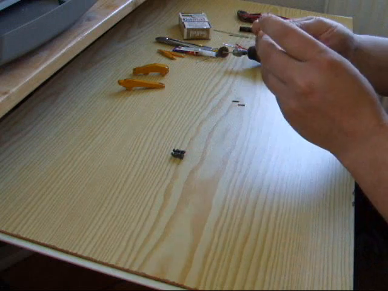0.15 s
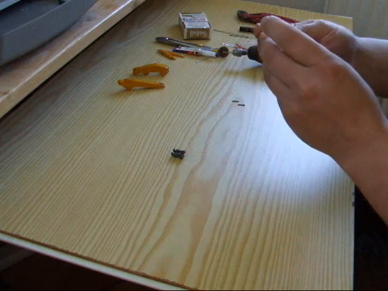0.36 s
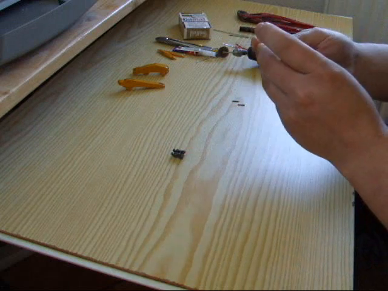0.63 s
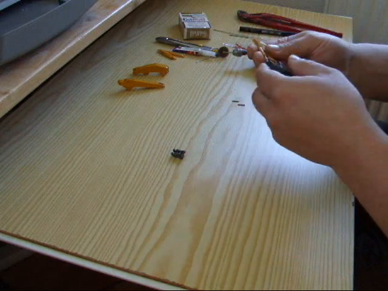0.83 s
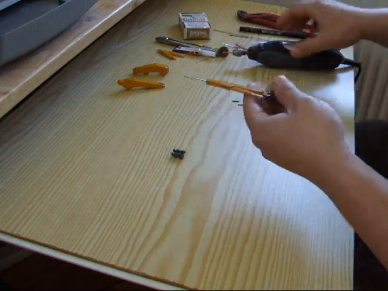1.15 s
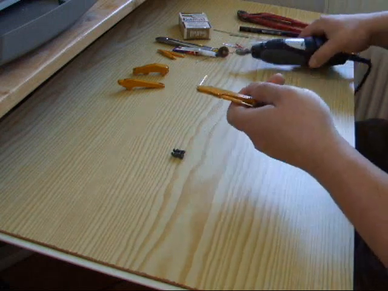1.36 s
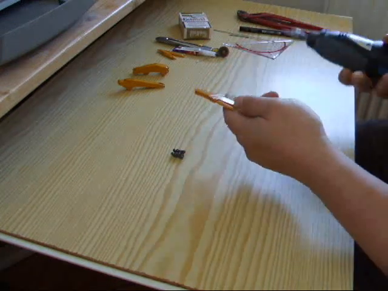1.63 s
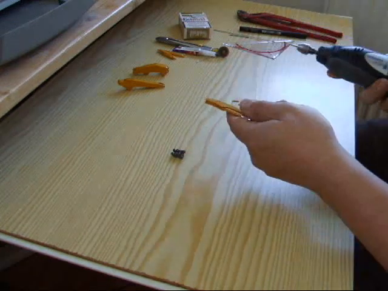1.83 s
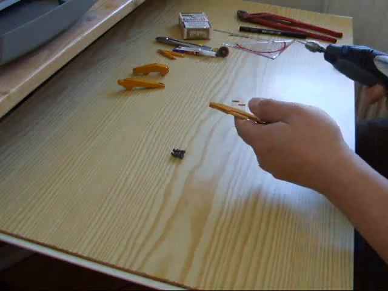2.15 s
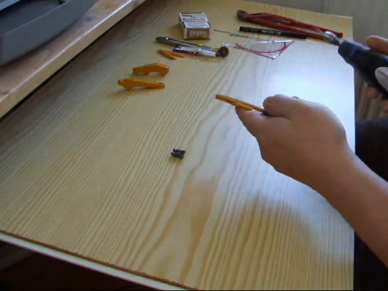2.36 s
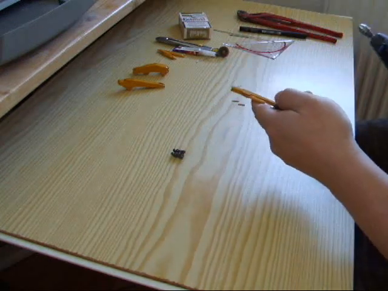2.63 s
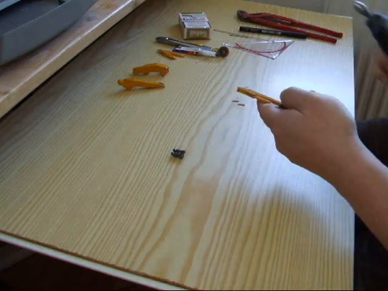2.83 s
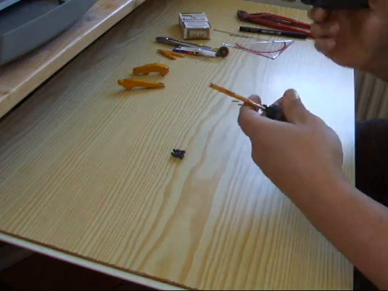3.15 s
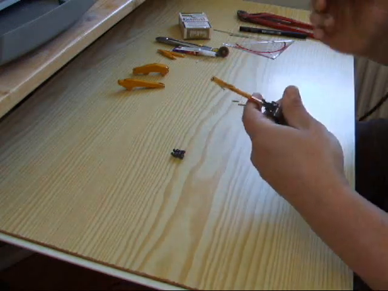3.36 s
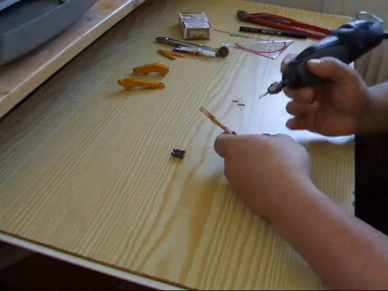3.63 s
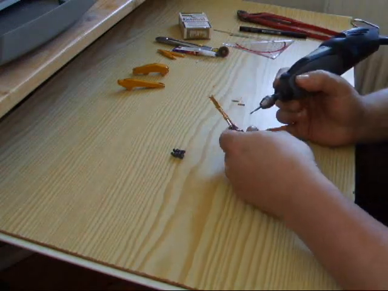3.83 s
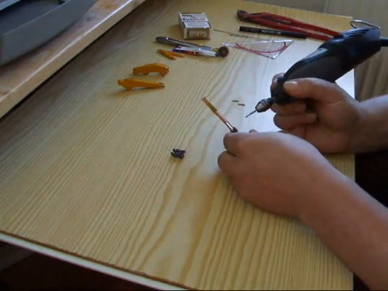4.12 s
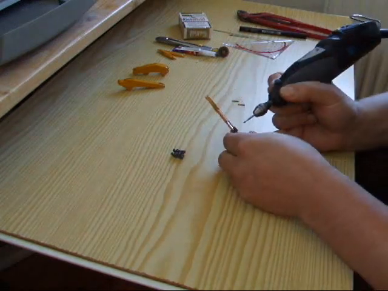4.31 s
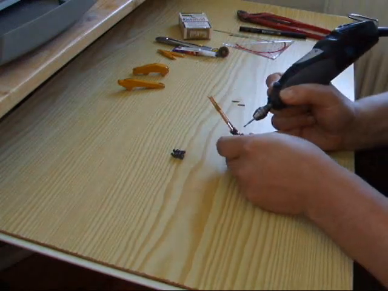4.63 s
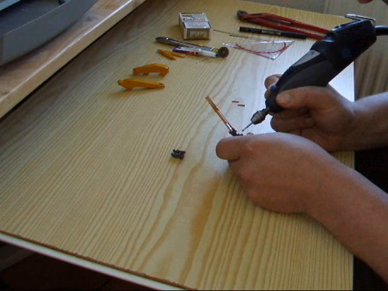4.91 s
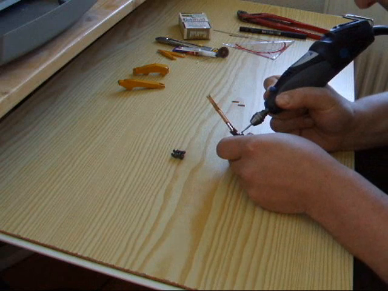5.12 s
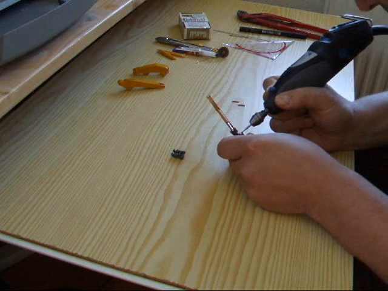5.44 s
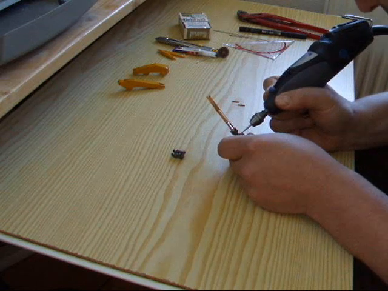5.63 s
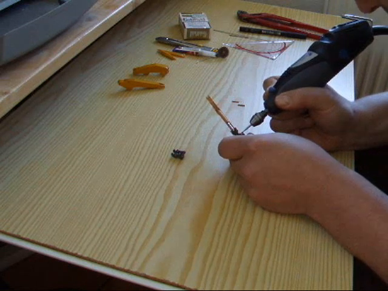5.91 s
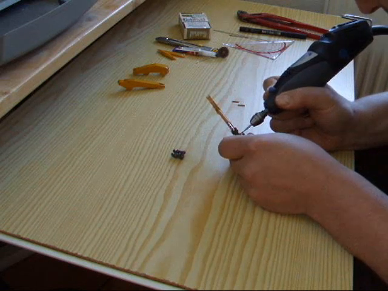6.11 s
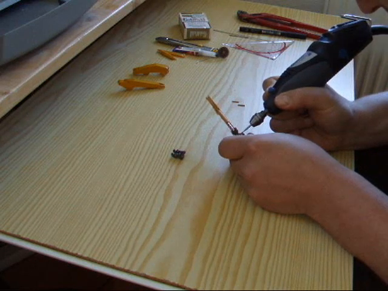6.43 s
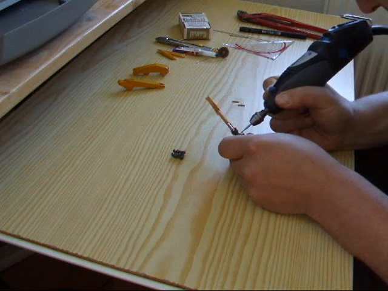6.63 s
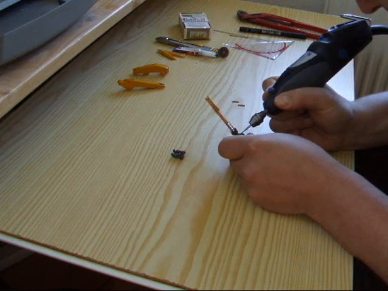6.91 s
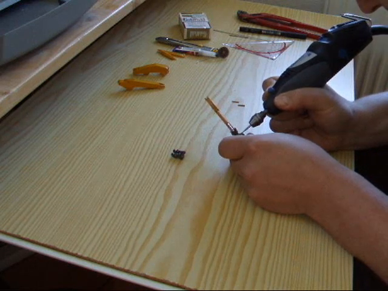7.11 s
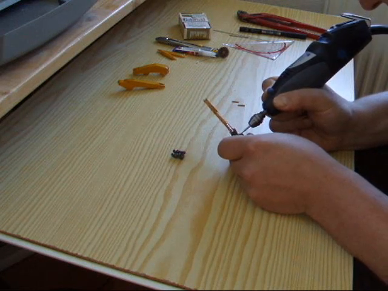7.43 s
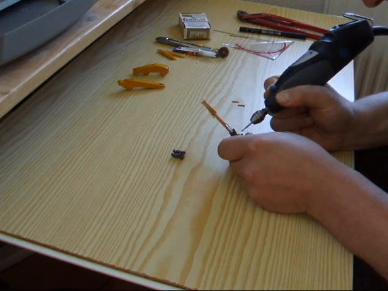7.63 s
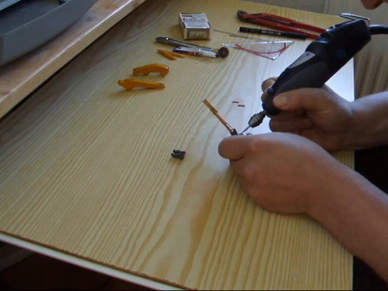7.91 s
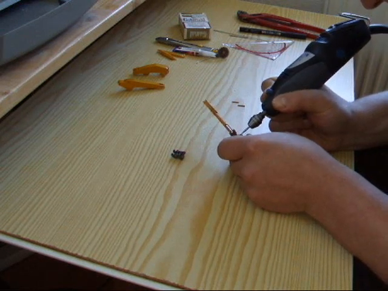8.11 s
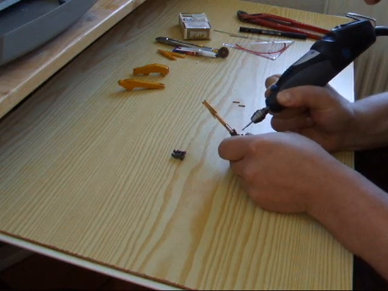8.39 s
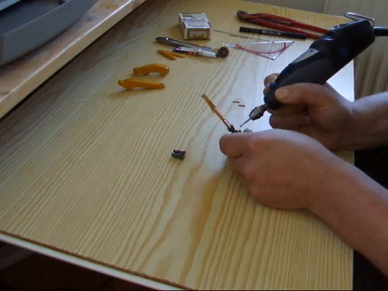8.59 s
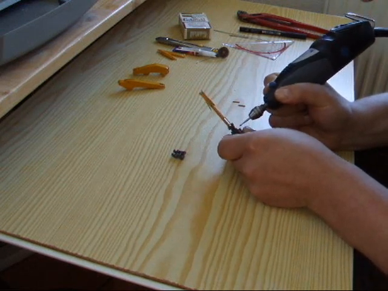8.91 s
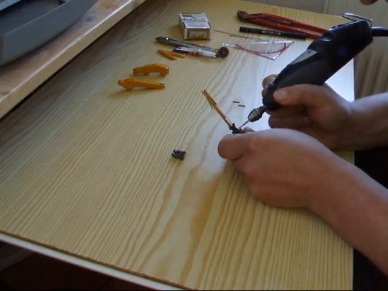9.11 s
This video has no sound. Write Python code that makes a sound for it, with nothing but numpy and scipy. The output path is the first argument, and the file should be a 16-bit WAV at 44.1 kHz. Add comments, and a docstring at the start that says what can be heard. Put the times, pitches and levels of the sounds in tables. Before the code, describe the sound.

Handheld rotary tool starts with a groan, settles into a high hissing whine, then its bit chatters and squeals into a small part as the pitch sags.

```python
"""Rotary tool drilling a small part

A small rotary tool is picked up from a wooden desk, switched on, and drills a small part held in the other hand.
Summed sines that follow the shaft give the whine and the mains-pulsed slot tones; filtered noise gives the hiss.
The bit squeals (shaped noise) and chatters (shaft overtones) as it bites, drags the speed down and nearly jams once.
Thin squeaks (gliding sines) come before the motor; knocks and clicks (noise clicks over decaying desk modes)
come before it and twice while it runs. A small room and a soft hiss lie behind.
"""
import sys
import numpy as np
from scipy import signal
from scipy.fft import rfft, irfft, next_fast_len
from scipy.io import wavfile

SR = 44100
rng = np.random.default_rng(int(sys.argv[2]) if len(sys.argv) > 2 else 0)


def dump_mix(stems):
    """Bounce the given channels to the path in sys.argv[1] as a 16-bit WAV at rate SR."""
    frames = np.atleast_2d(stems).T  # one column per channel
    limited = np.clip(frames, -1, 1)  # hard clip at full scale
    pcm = np.round(limited * 32767).astype(np.int16)
    wavfile.write(sys.argv[1], SR, pcm)


N = 408366
TIME = np.arange(N) / SR
MAINS_PULSE_HZ, FREE_HZ = 200, 531.8  # FREE_HZ: unloaded shaft speed
# the bit is pressed in ever harder, then let go; a cut shorter than rise_s ends before full drag:
# start_s, length_s, first_drag_hz_per_s, full_drag_hz_per_s, rise_s
CUTS = [(6.95, .72, 25, 1100, 1.2), (8.0, .44, 222, 1489, .369)]


def amp(db):
    """Decibels to gain."""
    return 10 ** (np.asarray(db) / 20)


def unit(x):
    """Scales to rms 1."""
    return x / np.sqrt(np.mean(x ** 2) + 1e-20)


def colour(x, points):
    """Filters by a spectrum drawn as (hz, db) on a log-frequency axis."""
    hz, db = np.transpose(points)
    size = next_fast_len(len(x) + 2048)
    f = np.fft.rfftfreq(size, 1 / SR)
    gain = amp(np.interp(np.log(f + 1), np.log(hz), db))
    return irfft(rfft(x, size) * gain, size)[:len(x)]


def drift(rate_hz):
    """Random wander of rms 1: straight lines between rate_hz random knots a second."""
    knots = rng.standard_normal(4096)
    return unit(np.interp(TIME * rate_hz, np.arange(len(knots)), knots))


def resonate(x, hz, width_hz):
    """One resonance."""
    return signal.lfilter(*signal.iirpeak(hz, hz / width_hz, SR), x)


def ring(x, modes, low_hz, high_hz):
    """Passes x through resonances, each at its own level, trims their skirts and scales to rms 1."""
    y = sum(amp(db) * unit(resonate(x, hz, width_hz)) for hz, width_hz, db in modes)
    return unit(signal.sosfilt(signal.butter(3, [low_hz, high_hz], "band", fs=SR, output="sos"), y))


def swell(start_s, attack_s, hold_s, release_s, db):
    """Gain of one event: a straight rise, a hold and an exponential tail."""
    t = TIME - start_s
    fall = np.exp(-np.clip((t - attack_s - hold_s) / release_s, 0, 40))
    return amp(db) * np.clip(t / attack_s, 0, 1) * fall


def tone(turns):
    """A sine that follows a count of cycles."""
    return np.sin((2 * np.pi * (turns % 1)).astype(np.float32))


def add(mix, start_s, sound):
    """Mixes a sound in at start_s."""
    part = mix[max(round(start_s * SR), 0):][:len(sound)]
    part += sound[:len(part)]


def pressure():
    """Drag on the shaft in Hz per s: the hand eases into each cut."""
    drag = 0
    for start_s, length_s, first, full, rise_s in CUTS:
        ease = np.sin(np.pi / 2 * np.clip((TIME - start_s) / rise_s, 0, 1)) ** 2
        drag = drag + (first + (full - first) * ease) * (TIME > start_s) * (TIME < start_s + length_s)
    return drag


def shaft(drag):
    """Speed in Hz and accumulated turns: pull grows with the lag, up to a limit, against the drag."""
    on_s, step = 2.12, 44  # step in samples
    pull_per_s, deep_pull_per_s, max_pull_hz_per_s = 2.558, 5.546, 1330
    stiff_share, stiff_s = .177, 1.39  # a little stiff at the start
    times, speeds_hz = TIME[::step], [0.]
    for t, load in zip(times[:-1], drag[::step]):
        lag = 1 - speeds_hz[-1] / FREE_HZ
        pull = FREE_HZ * (pull_per_s * lag + deep_pull_per_s * lag ** 3)
        pull *= 1 - stiff_share * np.exp((on_s - t) / stiff_s)
        net = min(pull, max_pull_hz_per_s) - load
        speeds_hz.append(speeds_hz[-1] + (t > on_s) * net * step / SR)
    hz = np.interp(TIME, times, speeds_hz) * (1 + .0005 * drift(70))  # never quite even
    return hz, np.cumsum(hz) / SR


def motor_levels(hz, wake_hz=235):
    """Gains of hiss, whine and low slot tone: they grow with speed and change as the tool is moved."""
    # level as the tool is moved about in the hand, with one brief dip: time_s, level_db
    loudness = [(2.3, 2.5), (2.9, .7), (3.5, 1), (4.15, 1.3), (4.6, 0), (5.9, 0), (6.48, -1.3), (6.6, -8),
                (6.72, -1.5), (6.95, -.5), (7.3, -2.5), (8.0, -1.2), (8.3, -3), (8.6, -1.5), (9.26, -.7)]
    # brief flares of the tones: centre_s, half_width_s (to 1/e in dB), low_slot_db, whine_db
    flares = [(2.38, .05, 0, 2), (2.97, .14, 7, 0), (3.1, .055, 14.5, 1.5), (3.7, .22, 2, 2.5),
              (4.18, .06, 2, 4), (7.58, .05, 4, 6), (8.42, .06, 0, 4)]
    # brushes spark on the starting current: start_s, attack_s, hold_s, release_s, level_db
    sparking = (2.11, .11, .22, .3, -35.5)
    # level laws: base_db, db_per_halving of speed
    air_law, whine_law, low_slot_law = (-26, -14), (1.5, -6.5), (-38, -34)
    whine_follows = 1.5  # the whine beams, so movement changes it more than the hiss

    def law_db(law):
        return law[0] + law[1] * np.log2(FREE_HZ / (hz + 1e-6))

    moved_db = np.interp(TIME, *np.transpose(loudness))
    low_db, whine_db = sum(np.outer(dbs, np.exp(-((TIME - centre_s) / width_s) ** 2))
                           for centre_s, width_s, *dbs in flares)
    air = np.hypot(amp(law_db(air_law) + moved_db), swell(*sparking))
    whine = amp(law_db(whine_law) + whine_follows * moved_db + whine_db)
    whine = whine * np.minimum(hz / wake_hz, 1) ** 6
    return air, whine, amp(law_db(low_slot_law) + moved_db + low_db)


def whine_lines(turns, strain):
    """Rotor lines at whole multiples of shaft speed and bearing lines between them."""
    # lines before the whine gain: shaft_multiple, level_db
    lines = [(1, -61), (2, -62), (2.55, -56), (3, -64), (7, -57), (14, -59), (17, -55), (18, -45),
             (18.79, -49), (19, -53), (20, -48), (21, -46), (22, -46), (23, -42), (23.23, -52), (24, -39),
             (25, -43), (25.16, -53), (26, -43), (27, -36), (28, -38), (28.16, -45), (29, -38), (30, -48),
             (31, -44), (32, -40), (33, -48), (34, -49)]
    # below full speed the lines sweep through many small resonances and flutter
    flutter_db = 2 + 3.5 * np.tanh(50 * strain)
    return sum(amp(db + flutter_db * np.tanh(drift(13))) * tone(k * turns + rng.random())
               for k, db in lines)


def pulling_lines(turns, strain, chatter):
    """Overtones of the slot tone that stand out while the motor pulls hard."""
    # lines before strain, damping and whine gain: shaft_multiple, level_db
    lines = [(24, -36), (32, -41), (40, -46)]
    pulling = np.tanh(12 * strain) * sum(amp(db + 3.5 * drift(30)) * tone(k * turns) for k, db in lines)
    return pulling / (1 + chatter / amp(-31))  # pressing on the work damps them


def slot(turns, sidebands, fray, smear=0.079):
    """A slot tone gated by the mains pulses; the housing smears each burst, and jerky torque frays it."""
    out = 0
    for m, db in sidebands:
        phase = turns + m * MAINS_PULSE_HZ * TIME + smear * m ** 2 + fray * drift(150)
        out = out + amp(db) * tone(phase)
    return out


def slot_tones(hz, turns, strain, high_slot_db=-37, resonance_db=12):
    """Tones at 16 and 8 a turn; the upper swells as it sweeps through the top resonances of the shell."""
    # relative sidebands, 16 a turn: sideband_number, level_db
    high_sidebands = [(-4, -17), (-3, -15), (-2, -3), (-1, 0), (0, -1), (1, -5), (2, -5)]
    # relative sidebands, 8 a turn: sideband_number, level_db
    low_sidebands = [(-2, -16), (0, -4), (1, -3), (2, 1), (3, -1), (4, -8)]
    # top resonances of the shell: centre_hz, half_width_hz (to 1/e in dB)
    shell_top = [(4750, 690), (6150, 200)]
    crossing = sum(np.exp(-((16 * hz - centre_hz) / width_hz) ** 2) for centre_hz, width_hz in shell_top)
    upper = slot(16 * turns, high_sidebands, strain)
    lower = slot(8 * turns, low_sidebands, strain / 2)
    return amp(high_slot_db + resonance_db * crossing) * upper, lower


def spark_noise(mains, swing_db=None):
    """White noise pulsed by the mains, with an optional random level."""
    noise = rng.standard_normal(N) * (1 + .12 * mains)
    return noise if swing_db is None else noise * amp(swing_db)


def air_hiss(mains):
    """Fan and brushes: shaped noise of rms 1."""
    # relative spectrum: pitch_hz, density_db_per_hz
    air_spectrum = [(60, -24), (130, -31), (400, -21.5), (900, -11), (1500, -8), (2000, -3), (2450, 1.5),
                    (3200, -1), (4800, 0), (6000, 0.5), (7400, -2), (10500, -1), (13000, -1), (15400, 5.5)]
    return unit(colour(spark_noise(mains, 0.76 * drift(40)), air_spectrum))


def housing_rattle(mains, air, steady_rattle_db=-26):
    """The loose shaft rattles until the hand steadies the tool; a trace follows the hiss."""
    # broad resonances, relative level: pitch_hz, width_hz, level_db
    housing = [(2520, 750, -12.5), (3100, 840, 13), (3750, 1500, 18.5), (4470, 170, 20)]
    # loose spell: start_s, attack_s, hold_s, release_s, level_db
    loose = (2.5, .9, .72, .2, -35.5)
    rattle = ring(spark_noise(mains, 2.0 * drift(150)), housing, 2600, 5800)
    return (swell(*loose) + amp(steady_rattle_db) * air) * rattle


def starting_groan(mains):
    """The starting current makes the housing groan: noise through shell resonances."""
    # shell resonances, relative level: pitch_hz, width_hz, level_db
    shell = [(780, 90, -21), (1430, 73, -18), (2294, 100, 2.5), (3930, 70, 2.5), (5080, 110, 2.5)]
    # groan: start_s, attack_s, hold_s, release_s, level_db
    groan_event = (2.11, .12, .19, .035, -36.5)
    return swell(*groan_event) * ring(spark_noise(mains), shell, 630, 6400)


def motor(hz, turns, chatter, slow_fade_db=-24):
    """Rotor and bearing lines, pulsed slot tones, hiss, and the groaning, rattling housing."""
    air, whine, low_slot = motor_levels(hz)
    mains = tone(MAINS_PULSE_HZ * TIME + 1 / 4)
    # a slow motor draws more current: its torque is jerky and its lines fray
    strain = np.clip(1 - hz / hz.max(), 0, .5)
    turns = turns + strain * (.015 * drift(300) + .02 * mains)
    lines = whine_lines(turns, strain)
    pulling = pulling_lines(turns, strain, chatter)
    upper, lower = slot_tones(hz, turns, strain)
    free = amp(slow_fade_db * strain) * (lines + upper)
    tones = whine * (free + pulling) + low_slot * lower
    return tones + air * air_hiss(mains) + housing_rattle(mains, air) + starting_groan(mains)


def contact(press, choke_db=-1.5, grab=.055):
    """Gains of squeal and chatter; a cut grabs with some pressure, and much of it chokes the cut."""
    # skids on the part, in light touches and around the cuts: start_s, length_s, squeal_db, chatter_db
    skids = [(5.67, .07, -33, -65), (5.92, .12, -30, -44), (6.2, .22, -37, -54), (6.41, .33, -29.5, -43),
             (6.93, .43, -26.5, -41), (7.655, .04, -26.5, -40), (7.995, .06, -23, -42),
             (8.435, .03, -32, -44), (8.88, .02, -29, -47)]
    cut_squeal_db, cut_chatter_db = -37, -34.2
    cut_attack_s, cut_release_s = .06, .025
    skid_rise_share, skid_release_s = .24, .017
    pressed = sum(swell(start_s, cut_attack_s, length_s - cut_attack_s, cut_release_s, 0)
                  for start_s, length_s, *_ in CUTS)
    cutting = np.tanh(press / grab) * amp(choke_db * press) * pressed
    squeal, chatter = amp(cut_squeal_db) * cutting, amp(cut_chatter_db) * cutting
    for start_s, length_s, squeal_db, chatter_db in skids:
        rise_s = skid_rise_share * length_s
        skid = swell(start_s, rise_s, length_s - rise_s, skid_release_s, 0)
        squeal, chatter = squeal + amp(squeal_db) * skid, chatter + amp(chatter_db) * skid
    return squeal, chatter


def bit_scrape(turns, depth, scrape=0.27, ring_db=-12):
    """Rubbing noise pulsed once a turn; a deeper bite lowers and widens the squeal and rings the bit."""
    # skimming the surface, relative spectrum: pitch_hz, density_db_per_hz
    skim_spectrum = [(50, -52), (150, -31), (2500, -10), (7500, -33), (9000, -10), (10000, 6), (11000, -4),
                     (12600, 7), (14300, 6), (15400, -15.5)]
    # deep bite, relative spectrum: pitch_hz, density_db_per_hz
    deep_spectrum = [(50, -26), (150, -23), (700, -16), (2500, -28.5), (3500, -9), (5500, -22),
                     (8000, -3.5), (10000, -2), (11200, -2), (12800, -2), (15400, -17)]
    # ring of the bit, relative level: pitch_hz, width_hz, level_db
    bit_ring = [(3520, 130, 0)]
    grip = amp(1.8 * drift(130))
    rubbing = rng.standard_normal(N) * (1 + scrape * tone(turns)) * grip
    skimming = np.sqrt(1 - depth) * unit(colour(rubbing, skim_spectrum))
    biting = np.sqrt(depth) * unit(colour(rubbing, deep_spectrum))
    return skimming + biting + amp(ring_db) * depth * ring(rubbing, bit_ring, 2800, 4400)


def bit_catches(hz, turns, squeal, depth, light_db=-5.5, whirl_db=-8):
    """The edges catch once a turn: overtones of the shaft, weighted by the answer of the held part."""
    # answer of the held part, relative: pitch_hz, level_db
    part_answer = [(260, -14), (310, -9), (350, 0), (440, -3), (520, -5), (700, -8), (1050, -11),
                   (1250, -9), (1550, -3.5), (1850, -5), (2060, -4), (2400, -16), (3000, -10), (3500, -3),
                   (4100, -9), (7000, -14), (8500, -15), (10500, -8), (13000, -10), (15400, -15)]
    whirl_per_turn = .27
    uneven = turns + .01 * drift(250)
    # near a stall the edges push rather than strike, and the high overtones fade
    dull = np.clip(.75 - hz / hz.max(), 0, 1)
    # the bit sticks and slips, and its overtones flutter together
    slip_db = 3.2 * drift(75)
    # a skidding bit whirls round its hole: a tone just under each overtone above the first
    whirl = amp(whirl_db) * np.tanh(squeal / amp(-28))
    catches = np.zeros(N)
    for k in range(1, 34):
        flutter_db = min(k / 4, 1) * (slip_db + 2.5 * drift(60))
        db = np.interp(k * hz, *np.transpose(part_answer)) - 6 * (k - 1) * dull + flutter_db
        db = db + (k > 1) * light_db * (1 - depth)
        phase = k * uneven + rng.random()
        catches += amp(db) * (tone(phase) + (k > 1) * whirl * tone(phase - whirl_per_turn * turns))
    return catches


def jam_hammer(turns):
    """The jammed bit hammers the part: noise blows, one a turn, ring its resonances."""
    # resonances of the part, relative level: pitch_hz, width_hz, level_db
    part_modes = [(355, 28, -1), (700, 420, 1), (1110, 710, -0.5), (2020, 2200, -12), (3000, 1400, 4),
                  (3940, 1100, -8), (4940, 320, 1.5), (6000, 500, -9), (7200, 1700, -12), (10200, 800, -4)]
    # jam: start_s, attack_s, hold_s, release_s, level_db
    jam = (8.222, .075, .016, .028, -16.5)
    blows = rng.standard_normal(N) * (.5 + np.exp(-(turns % 1) / 0.22))
    return swell(*jam) * ring(blows, part_modes, 340, 10000)


def bit(hz, turns, squeal, chatter):
    """Scraping and catching edges at their contact gains, and the hammering jam."""
    depth = np.tanh(chatter / amp(-32))
    scraping = squeal * bit_scrape(turns, depth)
    catching = chatter * bit_catches(hz, turns, squeal, depth)
    return scraping + catching + jam_hammer(turns)


def boom(turns, press, lowest_hz=345, give_s=.012):
    """The once-a-turn push of the bit, growing with pressure, rings the part's low modes as it slows."""
    # low modes of the part, gain of each: pitch_hz, width_hz, level_db
    low_modes = [(351, 14, -11), (403, 16, -10), (447, 10, -21)]
    keep = np.exp(-1 / (give_s * SR))  # the hand gives, so the push eases off
    push = signal.lfilter([1 - keep], [1, -keep], press ** 2.4) * tone(turns)
    push = signal.sosfilt(signal.butter(5, lowest_hz, "high", fs=SR, output="sos"), push)
    return sum(amp(db) * resonate(push, hz, width_hz) for hz, width_hz, db in low_modes)


def knocks(crack_s=0.0016, tail_db=-15, tail_s=0.027):
    """A hard plastic click with a short scatter, and the desk top ringing under it."""
    # knocks on the desk and clicks in the hand: start_s, click_db, desk_db
    hits = [(1.127, -47, -80), (1.345, -31, -39), (1.429, -34.5, -42), (1.437, -36, -49), (1.446, -42, -52),
            (1.764, -41, -75), (1.769, -28, -67), (3.614, -37, -47.5), (4.17, -28, -70)]
    # modes of the desk top, relative level: pitch_hz, level_db, t60_s
    desk_modes = [(270, -10, .12), (345, -5, .35), (560, -4, .14), (660, -6, .08), (775, -1, .09),
                  (870, -3, .1), (1030, -7, .07), (1230, -9, .07), (1500, -10, .1), (1680, -9, .07),
                  (2500, -11, .06)]
    # plastic click, relative spectrum: pitch_hz, density_db_per_hz
    click_spectrum = [(300, -26), (2800, -18), (4500, 4), (6500, 3), (9000, -2), (12000, -1), (15400, -6)]
    out, t = np.zeros(N), np.arange(SR // 4) / SR
    click_decay = np.exp(-t / crack_s) + amp(tail_db) * np.exp(-t / tail_s)
    for start_s, click_db, desk_db in hits:
        click = unit(colour(rng.standard_normal(len(t)), click_spectrum)) * click_decay
        desk = sum(amp(db - 60 * t / t60_s) * np.sin(2 * np.pi * (hz * t + rng.random()))
                   for hz, db, t60_s in desk_modes)
        add(out, start_s, amp(click_db) * click + amp(desk_db) * desk)
    return out


def squeaks(rough=0.028):
    """Short thin unsteady glides with one overtone."""
    # start_s, length_s, start_hz, end_hz, level_db, overtone_db (relative to the glide)
    glides = [(0, 0.015, 5000, 4900, -29, -34), (.027, .01, 4900, 4850, -42, -30),
              (0, .05, 6150, 6100, -48, -30), (.115, 0.047, 7200, 7450, -46, -10),
              (.12, 0.083, 6250, 6550, -51, 1), (.17, 0.056, 7700, 9200, -46, -16),
              (.2, 0.045, 8800, 8900, -44, -20), (.265, .04, 8500, 8000, -51, -20),
              (.28, 0.085, 6450, 5900, -55.5, 5), (.55, 0.052, 8150, 8050, -50, -20),
              (1.0, .08, 8000, 7700, -53, -20), (1.85, 0.06, 3300, 3500, -48, -25),
              (1.89, .07, 3250, 3050, -52, -25), (1.985, 0.065, 4200, 4380, -42.5, -30),
              (2.02, 0.11, 4300, 4400, -54, -30)]
    out, unsteady = np.zeros(N), drift(400)
    for start_s, length_s, start_hz, end_hz, db, overtone_db in glides:
        n = int(length_s * SR)
        wobble = 1 + rough * np.roll(unsteady, rng.integers(N))[:n]
        turns = np.cumsum(np.linspace(start_hz, end_hz, n) * wobble) / SR
        glide = tone(turns) + amp(overtone_db) * tone(2 * turns)
        add(out, start_s, amp(db) * signal.windows.tukey(n, .5) * glide)
    return out


def room(x, t60_s=0.15):
    """The dying scatter of a small room: x through decaying noise that starts after 4 ms."""
    t = np.arange(SR // 3) / SR
    tail = rng.standard_normal(len(t)) * amp(-60 * t / t60_s) * (t > .004)
    return signal.fftconvolve(x, tail / np.linalg.norm(tail))[:N]


def background_hiss():
    """Hiss of the room and microphone: shaped noise, all but steady."""
    # relative spectrum: pitch_hz, density_db_per_hz
    quiet_spectrum = [(15, -35), (25, -7), (304, -6), (409, -6), (521, -6), (580, -5), (629, -7.5),
                      (1050, -7), (1790, -9), (3910, -9.5), (8080, -9), (10900, -11.5), (15400, -15)]
    level_db = -50.5 + .5 * drift(13)
    return amp(level_db) * unit(colour(rng.standard_normal(N), quiet_spectrum))


def scene():
    """Tool and handling near the microphone over a soft hiss; both channels alike."""
    drag = pressure()
    hz, turns = shaft(drag)
    press = drag / drag.max()
    squeal, chatter = contact(press)
    near = motor(hz, turns, chatter) + bit(hz, turns, squeal, chatter) + knocks()
    thin = squeaks()
    echo = room(amp(-11) * near + amp(-4) * thin)
    return np.tile(near + boom(turns, press) + thin + echo + background_hiss(), (2, 1))


def record(dry):
    """The recorder's band limit: a linear-phase low-pass."""
    edge_hz = 15550
    lowpass = signal.firwin(511, edge_hz, window=("kaiser", 9), fs=SR)
    return signal.oaconvolve(dry, lowpass[None], "same")


dry = scene()
out = record(dry)
dump_mix(out)
```